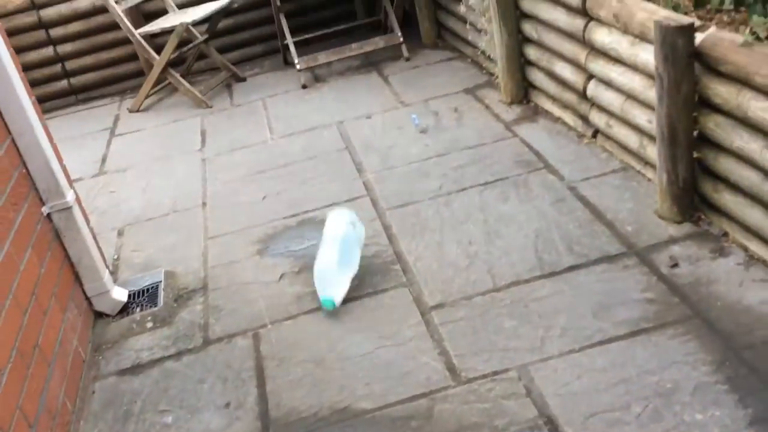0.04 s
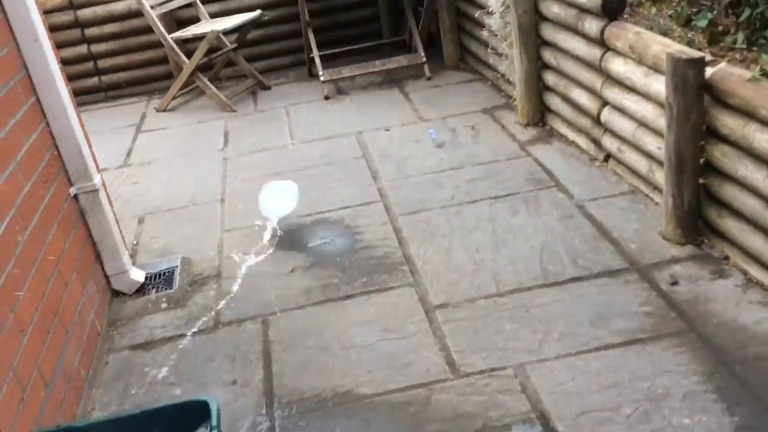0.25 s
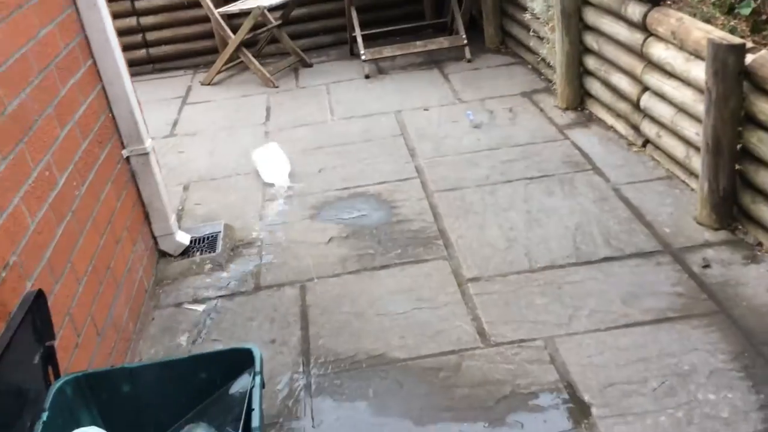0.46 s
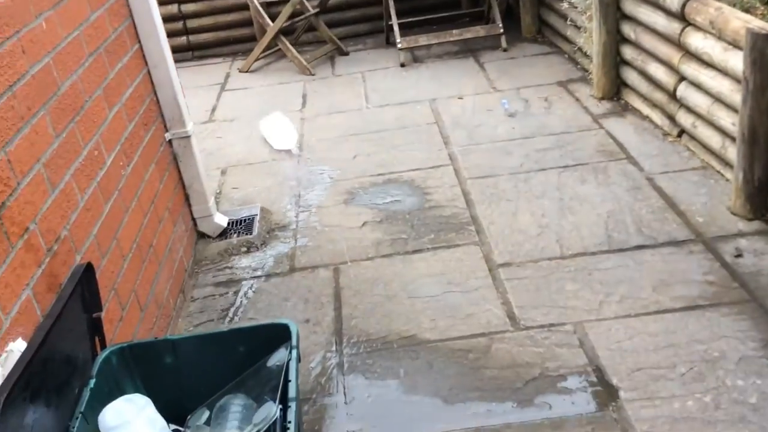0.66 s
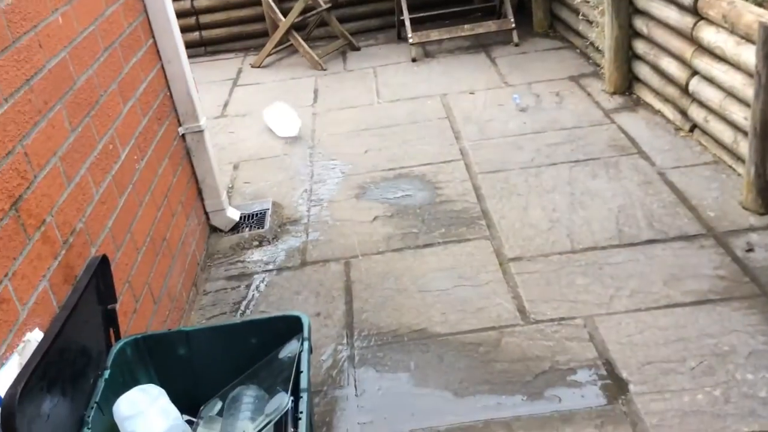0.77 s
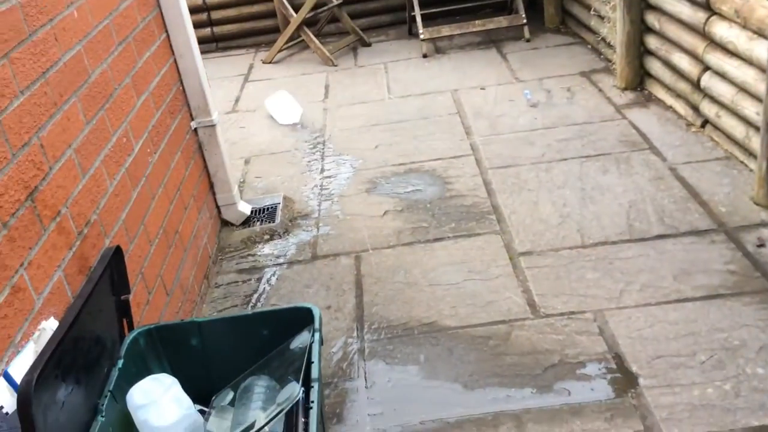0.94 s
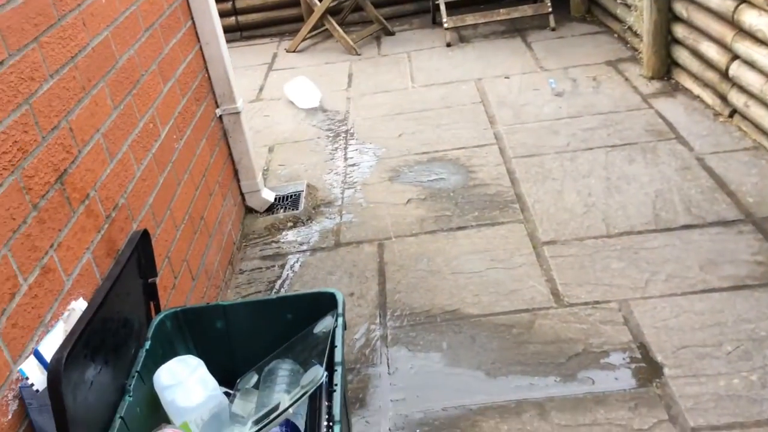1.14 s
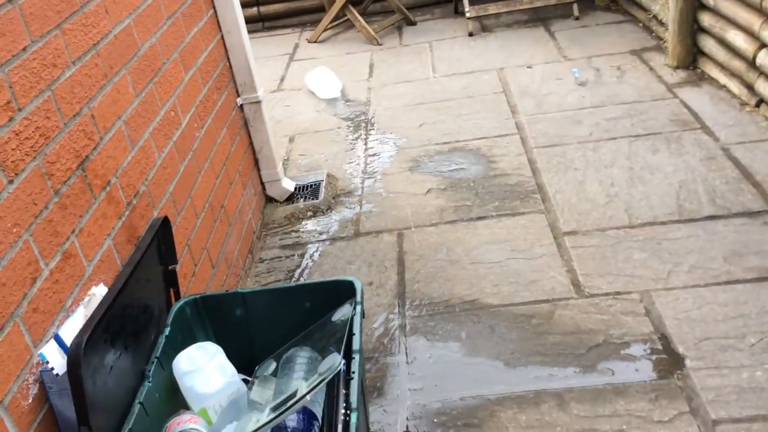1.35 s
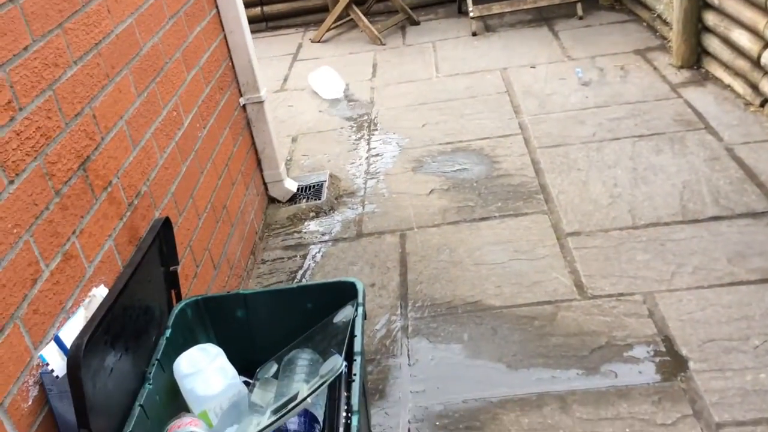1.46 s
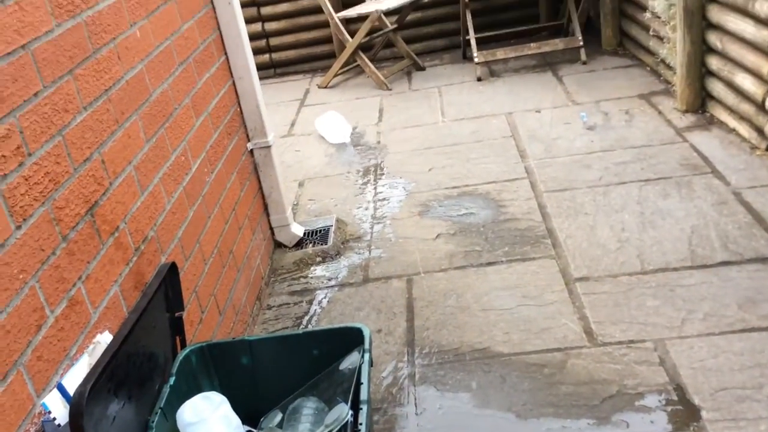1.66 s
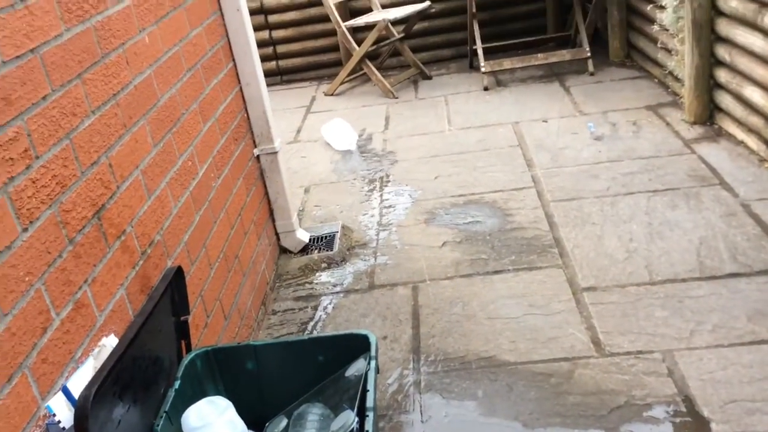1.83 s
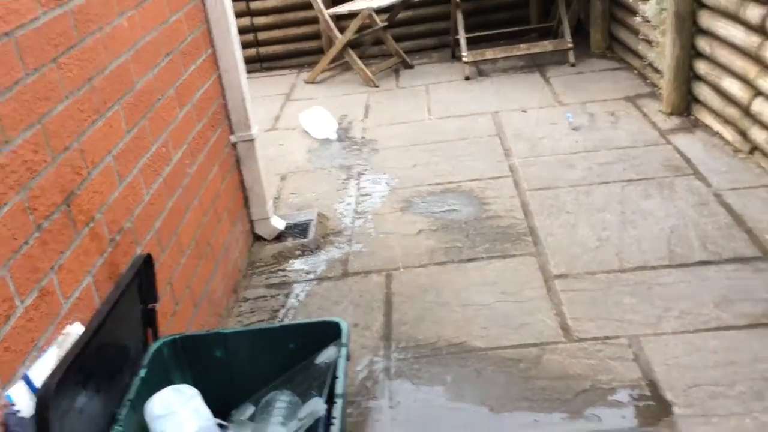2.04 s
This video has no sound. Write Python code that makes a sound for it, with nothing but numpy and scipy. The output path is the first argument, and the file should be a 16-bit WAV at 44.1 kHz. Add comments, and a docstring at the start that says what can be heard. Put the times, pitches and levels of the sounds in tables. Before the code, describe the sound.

A full plastic bottle hits patio paving at 0.2 seconds with a loud crack and thud, bursting and bouncing twice by 0.4. From about 0.45 water splashes and sprays across the stone while the bottle skids with faint scrapes and gurgles, dying away by 1.3. A close tick comes at 1.1, then small clicks and soft bumps until 2, with a sharper knock at 1.7, over quiet outdoor air.

```python
"""Over quiet outdoor air come two faint ticks and a soft bump. A full plastic bottle then hits the
paving of a walled patio, bursts and bounces: the shell buckles at each blow, the hard blows excite
its modes, and the water thumps inside. It skids away, scraping and gurgling, while sheets of water
slap the stone and a spray of drops dies as the bottle stops. Small ticks and soft bumps follow."""
import sys
import numpy as np
from scipy import signal
from scipy.fft import rfft, irfft
from scipy.io import wavfile

SR = 44100
rng = np.random.default_rng(int(sys.argv[2]) if len(sys.argv) > 2 else 0)


def transcribe(u):
    """Save the signal u as a 16-bit wav file named by the first command-line argument.

    u: samples, shape (n,) or (channels, n), limited to [-1, 1]; the rate is SR.
    q: integer samples, one column per channel.
    """
    v = np.clip(np.atleast_2d(u).T, -1, 1)
    q = np.round(v * 32767).astype(np.int16)
    wavfile.write(sys.argv[1], SR, q)


N = 92610
T, HZ = np.arange(N) / SR, np.fft.rfftfreq(N, 1 / SR)


def amp(db):
    """Amplitude grows tenfold for every 20 dB."""
    return 10 ** (np.asarray(db) / 20)


def unit(x):
    """Normalisation to an rms of one."""
    return x / np.sqrt(np.mean(x ** 2) + 1e-20)


def read(points, hz=HZ):
    """Interpolation on a logarithmic frequency axis."""
    f, value = np.transpose(points)
    return np.interp(np.log(hz + 1), np.log(f), value)


def colour(x, gain):
    """A minimum-phase filter shapes the spectrum and conserves the power of white noise."""
    cepstrum = irfft(np.log(np.maximum(unit(gain), 1e-5)), N)
    cepstrum[1:N // 2] *= 2
    cepstrum[N // 2 + 1:] = 0
    return irfft(rfft(x) * np.exp(rfft(cepstrum)), N)


def tilted(points, bass_db, treble_db, bass_hz=443.5, treble_hz=4500):
    """Bass and treble shelves tilt a spectrum."""
    bass = bass_db / (1 + (HZ / bass_hz) ** 2)
    treble = treble_db / (1 + (treble_hz / (HZ + 1)) ** 2)
    return amp(read(points) + bass + treble)


def wobble(top_hz):
    """Low-passed noise gives a slow fluctuation with an rms of one."""
    return unit(irfft(rfft(rng.standard_normal(N)) / (1 + (HZ / top_hz) ** 4), N))


def grains(per_s, spread_db):
    """Shot noise: independent impulses of uneven size."""
    size = amp(spread_db * np.minimum(rng.exponential(1, N), 4))
    return unit(size * rng.choice([-1, 1], N) * (rng.random(N) < per_s / SR))


def burst(x, start, rise, fade):
    """A transient of linear rise and exponential decay, whose envelope sets its energy."""
    age = np.maximum(T - start, 0)
    shape = np.minimum(age / rise, 1) * np.exp(-np.maximum(age - rise, 0) / fade)
    return unit(x * shape) * np.sqrt(np.mean(shape ** 2))


def ring(start, hz, t60, rise, turn=0):
    """A damped mode is a sinusoid that falls 60 dB in t60 seconds."""
    age = np.maximum(T - start, 0)
    return np.minimum(age / rise, 1) * amp(-60 * age / t60) * np.sin(2 * np.pi * (hz * age + turn))


def air(level_db=-65, sway_db=-0.5, sway_hz=12):
    """Outdoor background is broadband noise under slight amplitude modulation."""
    # Each row: frequency in Hz, spectral density of the air in dB.
    spectrum = [(25, -8), (70, -5.5), (110, -6), (190, -4.5), (330, -13), (480, -12), (800, -20),
                (1200, -21), (2500, -30.5), (4500, -28), (7000, -33), (9300, -29), (15500, -42.5)]
    return amp(level_db + sway_db * wobble(sway_hz)) * colour(rng.standard_normal(N), amp(read(spectrum)))


def ticks(swell_s=0.00084, snap_crackle_db=-1, knock_crackle_db=-6, sharp_s=0.00095):
    """An impulse and a crackle excite a bright snap and a hollow knock; short ticks click hardest."""
    # Each row: time in seconds, crackle fade in seconds, snap level in dB, knock level in dB.
    events = [(.028, 0.0031, -41, -31), (0.082, .002, -52, -37), (1.1242, 0.00067, -19, -39),
              (1.126, 0.0069, -32, -55), (1.315, 0.012, -38.5, -52), (1.401, .002, -40.5, -49),
              (1.559, 0.0012, -26, -34.5), (1.565, .008, -38, -55), (1.5758, 0.001, -22.5, -28),
              (1.5794, 0.0013, -34, -32), (1.5876, .0005, -23.5, -38), (1.639, 0.0027, -37.5, -25),
              (1.6512, .001, -33, -27.5), (1.679, 0.011, -32, -30), (1.686, 0.0017, -43, -22),
              (1.709, 0.00084, -16, -13.5), (1.883, 0.0011, -55, -27.5), (1.9491, 0.00084, -48.5, -34),
              (1.99, 0.0011, -40, -48)]
    # Each row of both spectra: frequency in Hz, spectral density in dB.
    snap_spectrum = [(300, -6), (2000, 5), (3800, 5), (5600, 11.5), (7200, 3), (9000, 5.5), (10500, -5.5),
                     (12200, -1), (15500, -10)]
    knock_spectrum = [(60, -32), (250, -8), (560, 5.5), (800, -2.5), (1100, 2.5), (2000, -3), (2800, -12.5),
                      (6000, -12.5), (15000, -73)]
    snap, knock = np.zeros((2, N))
    for s, fade, snap_db, knock_db in events:
        crackle = rng.standard_normal(N) * np.exp(-abs(T - s) / np.where(T < s, swell_s, fade))
        crackle /= np.linalg.norm(crackle)
        click = (np.arange(N) == round(s * SR)) * np.exp(-fade / sharp_s)
        snap += amp(snap_db) * (click + amp(snap_crackle_db) * crackle)
        knock += amp(knock_db) * (click + amp(knock_crackle_db) * crackle)
    return colour(snap, amp(read(snap_spectrum))) + colour(knock, amp(read(knock_spectrum)))


def patio(x, echo_db, delay_s=.006):
    """Reverberation: scattered reflections from wall, fence and paving follow the direct sound."""
    # Each row: frequency in Hz, reverberation time in seconds.
    decay_times = [(100, 0.073), (500, 0.13), (2000, 0.067), (6000, 0.07), (14000, 0.13)]
    reflections = rng.choice([-1., 1.], SR // 2) * (rng.random(SR // 2) < .1)
    hz, t, bands = signal.stft(reflections, SR, nperseg=256)
    tail = signal.istft(bands * amp(-60 * t / read(decay_times, hz)[:, None]), SR, nperseg=256)[1]
    response = np.pad(tail / np.linalg.norm(tail), (round(delay_s * SR), 0))
    return x + amp(echo_db) * signal.fftconvolve(x, response)[:N]


def bumps(low_hz=60):
    """Noise bursts confined to low frequencies sound soft and dull."""
    # Each row: start, rise and fade in seconds, level in dB, upper cutoff in Hz.
    events = [(.08, .04, 0.045, -56, 261.8), (.86, .01, 0.015, -51.5, 119),
              (1.38, 0.012, 0.036, -58.5, 110), (1.426, 0.004, 0.033, -52, 800),
              (1.52, 0.027, 0.019, -55, 258), (2.029, 0.034, .05, -61, 420)]
    out = np.zeros(N)
    for s, rise, fade, db, top_hz in events:
        passband = 1 / (1 + (HZ / top_hz) ** 6) / (1 + (low_hz / (HZ + 1)) ** 4)
        out += amp(db) * colour(burst(rng.standard_normal(N), s, rise, fade), passband)
    return out


def crumples(snaps_per_s=9000, spread_db=2):
    """Buckling: each blow releases a volley of snaps in the plastic, echoed from a new spot."""
    # Each row: start, rise and fade in seconds, then level, bass shelf and treble shelf in dB.
    blows = [(0.1932, 0.0009, 0.018, -29.5, -10.5, -5.5), (.1985, 0.00017, 0.0036, -15.5, -12, -1),
             (.202, 0.0026, 0.036, -20, -1, -4.5), (0.2069, 0.00041, 0.0015, -2.5, -12, -2),
             (.3123, 0.00057, 0.02, -24.5, -0.5, 5), (.321, 0.002, 0.042, -26.5, 12.5, 7),
             (.3655, 0.00085, 0.0096, -14.5, 2, -4), (.378, 0.0022, 0.019, -27, 4.5, 5.5)]
    # Each row: frequency in Hz, spectral density of the crumpling in dB.
    spectrum = [(40, -27), (90, -11), (230, 4), (370, -5.5), (800, 0), (1200, -3.5), (1450, -4.5),
                (2400, -4), (3600, -5), (4400, -9), (5200, -7.5), (6600, -16), (9000, -15), (12000, -22.5),
                (15500, -32)]
    out = np.zeros(N)
    for s, rise, fade, db, bass, treble in blows:
        snaps = burst(grains(snaps_per_s, spread_db), s, rise, fade)
        out += amp(db) * patio(colour(snaps, tilted(spectrum, bass, treble)), echo_db=-2)
    return out


def thumps():
    """The mass of the water lands and drives low, damped oscillations."""
    # Each row: start in seconds, frequency in Hz, level in dB, rise and t60 in seconds.
    landings = [(0.204, 128.5, -12.5, 0.0042, 0.089), (0.209, 83.6, -30, .004, 0.3),
                (0.32, 130, -21, .004, 0.056), (.335, 237, -19.5, .006, 0.081),
                (0.368, 207.5, -30, .004, 0.15), (0.35, 400, -23, 0.0014, .07)]
    return sum(amp(db) * ring(s, hz, t60, rise) for s, hz, db, rise, t60 in landings)


def shell(rise_s=0.0017):
    """Hard blows excite the normal modes of the bottle, which lie lower once it has split."""
    # Each row: frequency in Hz, relative level in dB, t60 in seconds.
    modes = [(251, -1, .23), (382, -6, .2), (502, 0, .2), (735, -1, .16), (855, 0, .16), (1006, -3, .17),
             (1055, -3, .16), (1270, 1, .17), (1717, 4, .16), (1863, -4, .18), (2169, -4, .17),
             (2548, -1, .16), (2802, -2, .16), (2997, -2, .12)]
    # Each row: start in seconds, level in dB, ratio applied to the mode frequencies.
    hard_blows = [(.207, -28, 1), (.322, -42, .948), (.366, -36, .948)]
    return sum(amp(blow_db + db) * ring(s, hz * ratio, t60, rise_s, rng.random())
               for s, blow_db, ratio in hard_blows for hz, db, t60 in modes)


def scrapes():
    """Friction and gurgling drive resonances, each heard as a swell of narrow-band noise."""
    # Each row: peak time and half length in seconds, centre and bandwidth in Hz, level in dB.
    swells = [(0.414, 0.0029, 4000, 600, -35.5), (.458, 0.0036, 3000, 990, -35),
              (0.468, .003, 3150, 710, -24), (0.477, 0.011, 395, 110, -34), (.472, 0.012, 695, 65, -35.5),
              (0.508, 0.009, 3830, 900, -28.5), (0.523, .003, 3600, 602, -27), (0.66, 0.02, 3500, 600, -43),
              (0.685, 0.046, 345.6, 151.2, -46), (0.806, 0.054, 3260, 700, -47),
              (0.923, 0.054, 1660, 164, -51.5), (1.069, 0.032, 323, 121, -52.5),
              (1.05, 0.13, 614, 70, -61.5), (1.083, 0.094, 744.8, 70, -58), (1.238, 0.027, 265, 101, -60.5),
              (1.446, 0.013, 393, 198, -59), (1.44, .012, 770, 200, -64.5)]
    out = np.zeros(N)
    for s, half, hz, width, db in swells:
        shape = np.exp(-((T - s) / half) ** 2 / 2)
        band = irfft(rfft(rng.standard_normal(N)) / (1 + (2 * (HZ - hz) / width) ** 4), N)
        out += amp(db) * unit(band * shape) * np.sqrt(np.mean(shape ** 2))
    return out


def slaps(drops_per_s=12000, spread_db=3):
    """A sheet of water strikes the stone as many drop impacts that merge into one burst."""
    # Each row: start, rise and fade in seconds, then level, bass shelf and treble shelf in dB.
    sheets = [(0.45, 0.002, 0.047, -32.5, -12, 15.5), (0.458, 0.013, 0.093, -27.5, -1.5, -11),
              (0.4957, 0.006, 0.017, -20, -33, 13.5), (0.518, 0.0034, 0.028, -38, 9, -34)]
    # Each row: frequency in Hz, spectral density of a slap in dB.
    spectrum = [(60, -16.5), (170, -11.5), (240, -4.5), (400, -4.5), (560, 0.5), (800, 3), (1250, 2),
                (1700, 4.5), (2600, -1), (3600, 2.5), (5000, -3), (6500, -4.5), (9000, -6), (12000, -14),
                (15500, -21)]
    out = np.zeros(N)
    for s, rise, fade, db, bass, treble in sheets:
        drops = burst(grains(drops_per_s, spread_db), s, rise, fade)
        out += amp(db) * colour(drops, tilted(spectrum, bass, treble))
    return out


def spray(drops_per_s=12000, spread_db=1.5, clump_db=1.0, clump_hz=45, split_hz=(1200, 5000)):
    """Fine drops on the stone add up to shot noise, which comes in clumps and fades as the bottle slows."""
    # Each row: time in seconds, then relative levels of the low, middle and high bands in dB.
    contour = [(0.498, -35.5, -28.5, -60), (.545, -34, -38.5, -38), (.592, -47.5, -42, -38.5),
               (0.616, -39.5, -30.5, -35), (0.644, -43, -41.5, -39.5), (.695, -42, -37, -38.5),
               (.745, -48, -42, -45), (.835, -45.5, -41.5, -42.5), (0.869, -51, -44.5, -48),
               (.99, -51, -50, -50.5), (1.042, -49, -51, -53.5), (1.1, -55, -55, -56.5),
               (1.16, -54, -54, -53), (1.21, -55.5, -59, -62), (1.256, -69, -67, -72),
               (1.3, -82.5, -88.5, -82)]
    # Each row: frequency in Hz, spectral density of the spray in dB.
    spectrum = [(35, -54.5), (60, -13), (201, -4), (242, 0), (385, 1), (572, 4.5), (657, -0.5), (721, 3),
                (1260, -5), (1630, -5), (2050, -4.5), (2310, -3), (3050, -5.5), (3840, -3.5), (4420, -6.5),
                (7200, -12), (9300, -10.5), (14500, -25), (15500, -37)]
    times, *levels = np.transpose(contour)
    drops = rfft(grains(drops_per_s, spread_db)) * amp(read(spectrum))
    band = np.digitize(HZ, split_hz)
    out = np.zeros(N)
    for k, db in enumerate(levels):
        envelope_db = np.interp(T, times, db, left=-120, right=-120) + clump_db * wobble(clump_hz)
        out += unit(irfft(drops * (band == k), N)) * amp(envelope_db)
    return out


def scene(spray_db=-1):
    """The sources superpose in one channel; the ticks, being close, carry little reverberation."""
    water = patio(slaps() + amp(spray_db) * spray(), echo_db=-10.5)
    near = patio(ticks(), echo_db=-17.5)
    return (crumples() + thumps() + shell() + scrapes() + water + near + bumps() + air())[None]


def record(dry, low_cut_hz=24, knee=.5, ceiling=.85, top_hz=15500):
    """The microphone cuts the lowest bass, saturates softly above the knee and limits the bandwidth."""
    thinned = signal.sosfilt(signal.butter(2, low_cut_hz, "highpass", fs=SR, output="sos"), dry)
    linear = np.clip(thinned, -knee, knee)
    limited = linear + (ceiling - knee) * np.tanh((thinned - linear) / (ceiling - knee))
    lowpass = signal.firwin(511, top_hz, window=("kaiser", 9), fs=SR)
    return signal.oaconvolve(limited, lowpass[None], "same")


dry = scene()
out = record(dry)
transcribe(out)
```